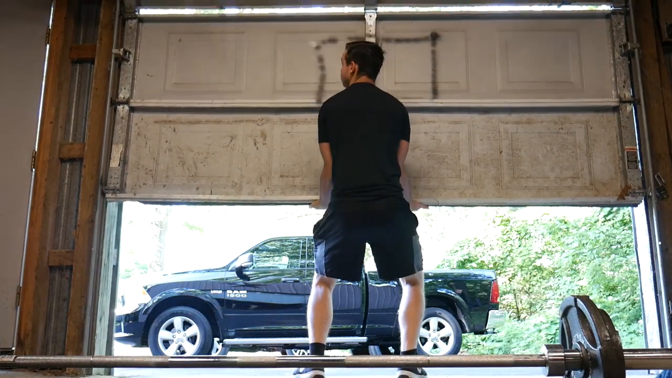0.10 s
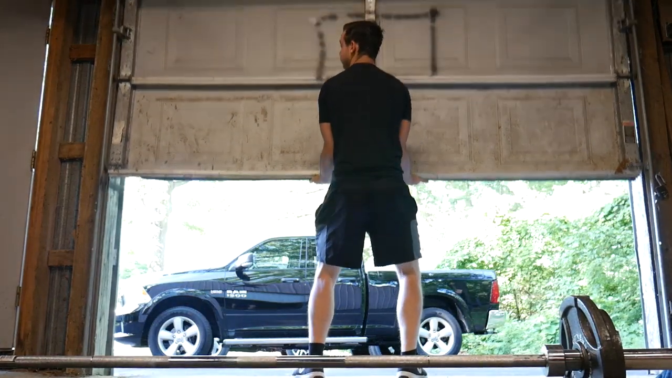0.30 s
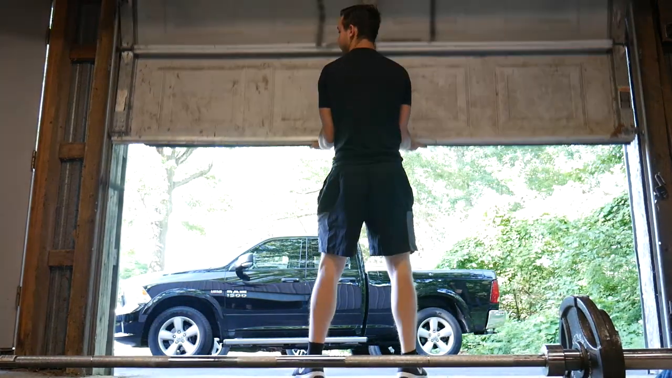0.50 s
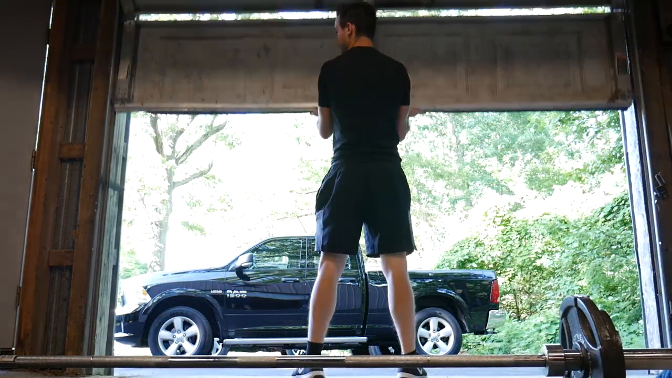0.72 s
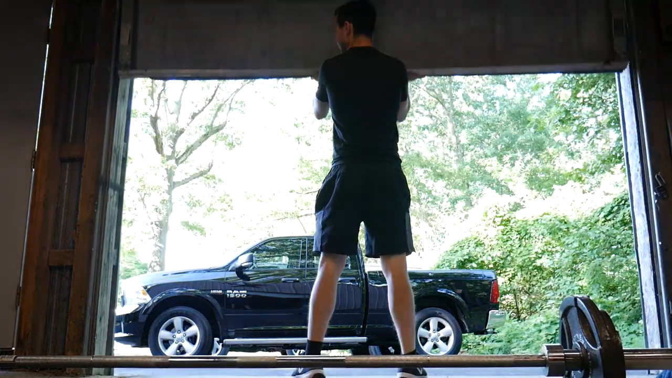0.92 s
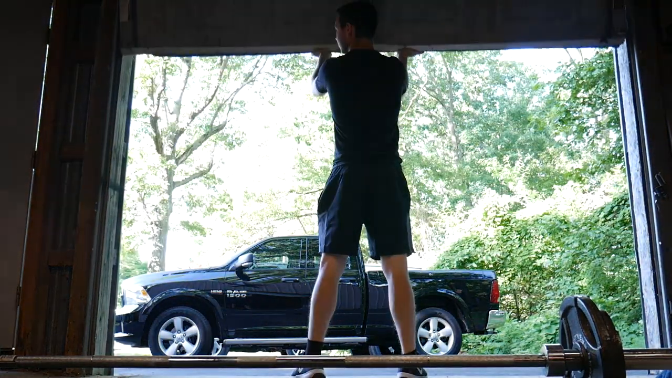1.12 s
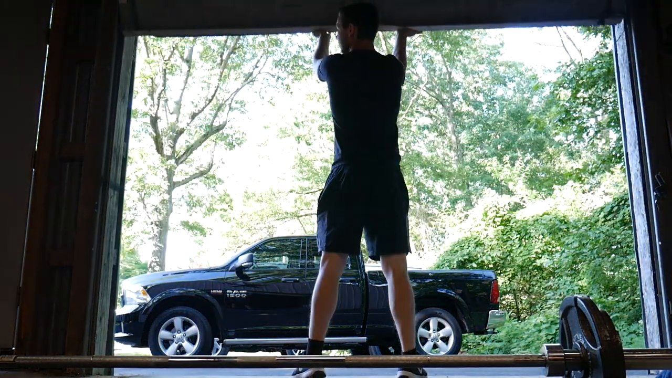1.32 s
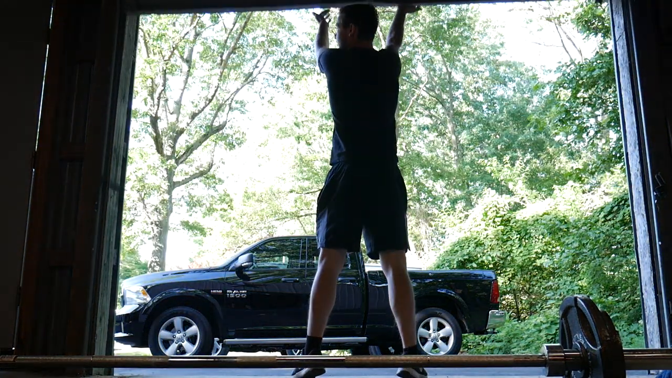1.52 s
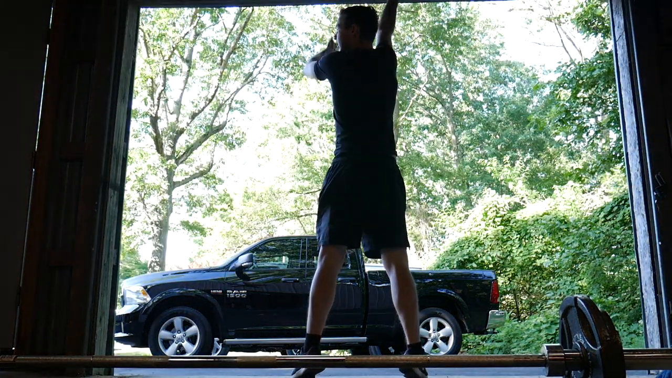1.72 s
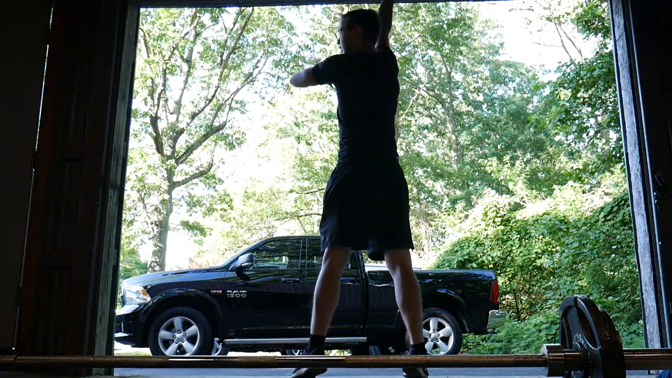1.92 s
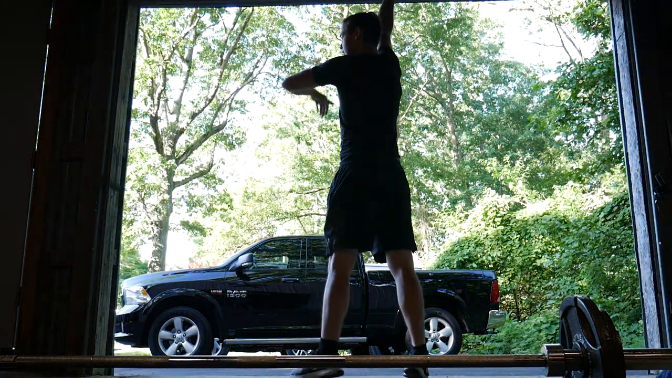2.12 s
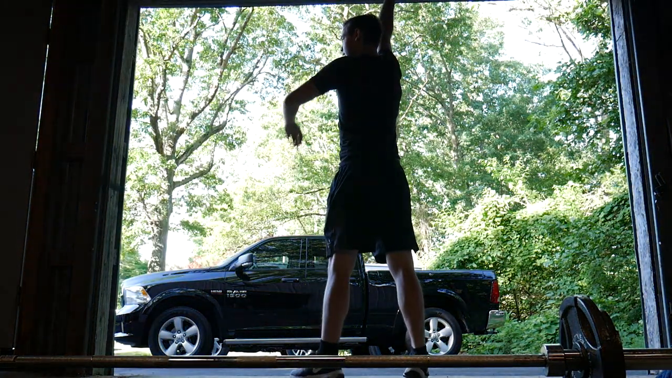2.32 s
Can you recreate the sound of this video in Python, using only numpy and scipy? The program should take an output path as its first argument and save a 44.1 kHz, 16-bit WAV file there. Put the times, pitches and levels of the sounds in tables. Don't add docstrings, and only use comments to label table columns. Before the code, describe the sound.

A sectional metal garage door rolls up by hand in a hard-walled garage, a few metres from a phone. Roller chatter starts softly, swells by 0.5 s, with dense hinge clacks until about 1.15 s and a low panel rumble. Sparser clacks lead to a hard, bouncing bang at 1.7 s with a short metallic ring. Fine ticks follow around 2.1 s, then a weak knock at 2.25 s over faint hiss.

```python
import sys
import numpy as np
from scipy import signal
from scipy.fft import rfft, irfft
from scipy.io import wavfile
from scipy.ndimage import uniform_filter1d

SR = 44100
rng = np.random.default_rng(int(sys.argv[2]) if len(sys.argv) > 2 else 0)


def gain_from_decibels(decibels):
    exponent = np.asarray(decibels, float) / 20
    return 10 ** exponent


def put_to_file(sound):
    columns = np.atleast_2d(sound).T
    safe = np.clip(columns, -1, 1)
    whole_steps = np.round(safe * 32767)
    wavfile.write(sys.argv[1], SR, whole_steps.astype(np.int16))


N = 105840

# [t/s, level/dB, brightness/(dB per octave)]
ROLLING_COURSE = [(0, -28.5, -9.5), (.1, -31, 0.5), (.2, -25.5, 1.5), (.3, -21, 2), (.44, -18, 1.7),
                  (.52, -16.5, 2), (.66, -20, 2.2), (.76, -18, 1.5), (.85, -17.5, 0.4), (.95, -20, 2.3),
                  (1.1, -20.5, 1.2), (1.25, -22.5, -0.3), (1.401, -25, 1.5), (1.55, -21.5, 1.6),
                  (1.64, -21.5, 0.65), (1.68, -24.5, 1.1), (2, -38, 1.4), (2.4, -42, -8)]
# [f/Hz, density/(dB per Hz)]
ROLLER_SPECTRUM = [(120, -30), (300, -10.5), (520, -9), (900, -1.5), (1900, -7.5), (9300, -27),
                   (10300, -32), (15500, -39)]
# [f/Hz, level/dB, t60/s]
TRACK_MODES = [(330, -11, .06), (526, -9, .05), (680, -7, .05), (770, -5, .06), (845, -5, .05),
               (925, -7, .05), (990, -7, .05), (1095, -9, .04), (1270, -10, .04), (1600, -11, .04),
               (2015, -11, .05)]
# [t/s, level/dB]
RUMBLE_COURSE = [(0, -50), (.15, -49), (.3, -37), (.6, -48), (.8, -38), (.9, -31), (1.05, -31.5),
                 (1.15, -31.5), (1.4, -36), (1.52, -31.5), (1.6, -27.5), (1.68, -35.5), (1.78, -36),
                 (1.95, -39.5), (2.05, -47), (2.4, -61)]
# [f/Hz, density/(dB per Hz)]
PANEL_SPECTRUM = [(25, -20), (54, -44), (95, 0.5), (135, -0.5), (170, 11), (230, -1.5), (325, -6),
                  (450, -18.5)]
# [t/s, level/dB, brightness/(dB per octave), f of struck part/Hz, ring level/dB]
CLACK_EVENTS = [(0.03, -29, 1, 6000, -29), (0.0345, -23.5, -3.5, 3400, -11), (0.046, -32, -6, 3200, -5),
                (0.06, -28.5, 0.5, 2400, -22), (.136, -26.5, -4, 940, -1), (.192, -39, -3, 1170, -9),
                (.458, -13, 0, 5000, -21), (0.572, -20, -7, 820, 4), (.615, -21, -7, 800, 5),
                (0.491, -21, -12, 1700, -6), (.515, -19, -1, 2030, -16), (.55, -19, -3, 2820, -16),
                (.41, -30.5, -8, 328, 8.5), (.662, -25, 0, 890, 4), (.69, -14.5, -4, 2000, -8),
                (.725, -18.5, -7, 2200, -21), (.768, -16.5, -0.5, 2980, -6), (0.7771, -13, 1, 3100, -5.5),
                (0.8054, -15, -1, 7300, -14), (.807, -16.5, 1, 1330, 2.5), (.832, -10.5, -5.5, 820, -5),
                (0.846, -21, -7, 2660, 3.5), (.856, -15, 0, 1070, 2), (.899, -20, -3, 1000, -5),
                (0.99, -12, -5, 5940, -6), (1.018, -16.5, -3, 1070, -1.5), (1.047, -19, -2.5, 2940, 0),
                (1.029, -9, -4.5, 2280, -17), (1.156, -17.5, -1.5, 8400, -16), (1.326, -26, 8, 9540, -8),
                (1.409, -25.5, 0.5, 6000, -28), (1.459, -18.5, -2, 4100, -28),
                (1.506, -14.5, -4, 2800, -19), (1.279, -22.5, -1.5, 1600, -21), (1.77, -20, -8, 920, 1),
                (2.038, -24.5, 0.5, 4170, -20), (2.042, -24.5, -2.5, 860, -4), (2.078, -39.5, 7, 766, 3),
                (2.2455, -38.5, 1, 9300, 2.5), (2.2512, -22.5, -2, 2700, -21), (2.256, -28, 2, 1540, 4),
                (2.272, -32.5, -3, 770, 1.5)]
# [f/Hz, density/(dB per Hz)]
CLACK_SPECTRUM = [(120, -62), (300, -62), (800, -12), (1530, -8.5), (1840, -7), (1980, -7.5), (3180, -8),
                  (3950, -7.5), (15500, -25.5)]
# [t/s, level/dB]
SLAM_BOUNCES = [
    (1.6966, -6.5),
    (1.704, -10.5),
    (1.716, -9),
    (1.728, -16.5),
]
# [f/Hz, density/(dB per Hz)]
SLAM_SPECTRUM = [(200, -32), (900, -11), (1450, -3.5), (1750, -7.5), (2150, -3.5), (3100, -11),
                 (3900, -7.5), (15500, -27.5)]
# [t/s, level/dB]
BRACKET_BLOWS = [
    (1.6972, -13),
    (2.2522, -35.5),
]
# [f/Hz, level/dB, t60/s]
BRACKET_MODES = [(991, -13, .2), (1502, -8, .2), (2015, 1.5, .3), (2060, -2, .1), (2110, 0, .08),
                 (2210, 3, .08), (2320, 1.5, .08), (2385, -2, .08), (2600, -4, .08), (2920, -6, .1),
                 (3790, -4, .4), (3850, -8, .3), (3885, -6, .3)]
# [t/s, peak level/dB, f/Hz]
SETTLING_TICKS = [
    (1.955, -25, 8060),
    (2.083, -14, 7800),
    (2.1, -18, 8200),
    (2.107, -31, 8000),
    (2.126, -15.5, 4420),
    (2.142, -23, 8500),
    (2.154, -19, 7950),
    (2.173, -34, 8500),
    (2.186, -40, 7040),
]
# [f/Hz, t60/s]
ROOM_T60 = [(100, 0.64), (500, 0.61), (1400, 0.46), (3700, 0.48), (9700, 0.36), (15000, 0.25)]
# [f/Hz, density/(dB per Hz)]
AIR_SPECTRUM = [(15, -40), (25, -36), (551, -18), (894, 12), (7890, 1), (9790, -5), (12800, -12),
                (15500, -31)]
# [f/Hz, side minus mid level/dB]
STEREO_WIDTH = [(60, -16), (110, -27.5), (200, -32), (380, -25.5), (700, -34), (1290, -32), (2380, -26),
                (4400, -20.5), (8120, -19), (15000, -11)]
OCTAVES = 31.25 * 2 ** np.arange(10)
SIDE_BANDS = 100 + 480. * np.arange(34)


def rolling():
    knocks_per_s, knock_spread_db = 2600, 3
    track_db, rail_hz, rail_t60_s = -19.5, 797, .09
    t, course = np.arange(N) / SR, np.array(ROLLING_COURSE)
    level_db = np.interp(t, course[:, 0], course[:, 1])
    bright_db = np.interp(t, course[:, 0], course[:, 2])
    chance = rng.random((3, N))
    size = gain_from_decibels(knock_spread_db * np.minimum(-np.log(chance[1] + 1e-9), 4))
    knocks = (chance[0] < knocks_per_s / SR) * size * np.sign(chance[2] - .5)

    track = sum(gain_from_decibels(db + 2.6 * walk(20)) * unit(ring(knocks, hz, t60)) for hz, db, t60 in TRACK_MODES)
    rail_db = -7.5 + 0.82 * (level_db - level_db.max()) + 2.34 * walk(12)
    rail = gain_from_decibels(rail_db) * unit(ring(knocks, rail_hz, rail_t60_s))
    body = unit(colour(knocks, ROLLER_SPECTRUM)) + gain_from_decibels(track_db) * unit(track) + rail

    shared = walk(15)
    flickering = 0
    for hz, band in zip(OCTAVES, split(body, OCTAVES)):
        tilt_db = bright_db * max(np.log2(hz / 1000), 0)
        flickering = flickering + band * gain_from_decibels(tilt_db + .7 * (shared + walk(16.78)))
    return flickering * gain_from_decibels(level_db - 4.0)


def panels():
    rumble = unit(colour(rng.standard_normal(N), PANEL_SPECTRUM))
    rumble = signal.sosfilt(signal.butter(4, 480, fs=SR, output="sos"), rumble)
    level_db = np.interp(np.arange(N) / SR, *np.array(RUMBLE_COURSE).T)
    return rumble * gain_from_decibels(level_db - 4.5 + 0.26 * walk(10.0))


def slam():
    out, t = np.zeros(N + SR), np.arange(SR // 2) / SR
    for s, db in SLAM_BOUNCES:
        blow = colour(rng.standard_normal(len(t)), SLAM_SPECTRUM) * blow_shape(t)
        place(out, s, gain_from_decibels(db - 5.5) * early_unit(blow))
    return out[:N]


def clacks():
    part_spread, part_t60_s = 0.086, .013
    out, t = np.zeros(N + SR), np.arange(SR // 2) / SR
    shape = blow_shape(t)
    for s, db, tilt_db, hz, ring_db in CLACK_EVENTS:
        noise = rng.standard_normal(len(t))
        blow = early_unit(colour(noise, CLACK_SPECTRUM, tilt_db) * shape)
        part = sum(ring(noise * shape, hz * (1 + part_spread * k), part_t60_s) for k in (-1, 0, 1))
        place(out, s, gain_from_decibels(db - 5.5) * (blow + gain_from_decibels(ring_db) * early_unit(part)))
    return out[:N]


def bracket():
    out, t = np.zeros(N + SR), np.arange(SR // 2) / SR
    for s, db in BRACKET_BLOWS:
        scatter, sign = rng.standard_normal((2, len(BRACKET_MODES)))
        for (hz, mode_db, t60), a, b in zip(BRACKET_MODES, scatter, sign):
            decay = gain_from_decibels(db + mode_db + 1.5 * a - 60 * t / t60)
            place(out, s, decay * np.sin(2 * np.pi * hz * t) * np.sign(b))
    return out[:N]


def ticks():
    t60_s, level_db = 0.0016, 1.5
    out, t = np.zeros(N + SR), np.arange(SR // 2) / SR
    for s, db, hz in SETTLING_TICKS:
        place(out, s, gain_from_decibels(db + level_db) * np.sin(2 * np.pi * hz * t) * gain_from_decibels(-60 * t / t60_s))
    return out[:N]


def garage(x):
    build_s, change_s, level_db = 0.0022, .035, 4
    hop, t = int(change_s * SR), np.arange(2 ** 15) / SR
    build = 1 - np.exp(-t / build_s)
    fades = [gain_from_decibels(-60 * t / read(ROOM_T60, hz)) * build for hz in OCTAVES]
    x, out = np.pad(x, (hop, 2 * hop)), np.zeros(N + 4 * hop + len(t))
    bands = split(rng.standard_normal(8 * len(t)), OCTAVES)
    window = np.sin(np.pi * np.arange(2 * hop) / (2 * hop))
    for i in range(0, N + hop, hop):
        start = rng.integers(7 * len(t))
        tail = sum(band[start:start + len(t)] * fade for band, fade in zip(bands, fades))
        tail = tail / np.sqrt(np.sum(tail ** 2))
        out[i:i + 2 * hop + len(t) - 1] += signal.fftconvolve(x[i:i + 2 * hop] * window, tail)
    return gain_from_decibels(level_db) * out[hop:hop + N]


def flicker(side):
    frame, frame_share, band_share = 1024, .5, .6
    chance = rng.random((N // frame + 2, len(SIDE_BANDS) + 1))
    frame_on = chance[:, :1] < frame_share
    band_on = chance[:, 1:] < band_share * (1.5 - SIDE_BANDS / 14000)
    gates = np.repeat(1. * frame_on * band_on, frame, axis=0)[94:N + 94]
    gates = uniform_filter1d(gates, size=500, axis=0).T
    return sum(gate * band for gate, band in zip(gates, split(side, SIDE_BANDS)))


def air():
    return gain_from_decibels(-41) * unit(colour(rng.standard_normal(N), AIR_SPECTRUM))


def unit(x):
    return x / np.sqrt(np.mean(x ** 2))


def early_unit(x):
    return x / np.sqrt(np.mean(x[:SR // 50] ** 2))


def blow_shape(t):
    return np.exp(-t / 0.0073) * (1 - np.exp(-t / 0.00065))


def place(out, s, sound):
    start = int(s * SR)
    out[start:start + len(sound)] += sound


def read(table, hz):
    table = np.array(table)
    return np.interp(np.log(hz + 1), np.log(table[:, 0]), table[:, 1])


def colour(x, table, tilt_db=0.):
    hz = np.arange(len(x) // 2 + 1) * SR / len(x)
    gain_db = read(table, hz) + tilt_db * np.log2((hz + 50) / 2000)
    return irfft(rfft(x) * gain_from_decibels(gain_db), len(x))


def ring(x, hz, t60):
    r = np.exp(-np.log(1000) / (max(t60, .002) * SR))
    angle = 2 * np.pi * hz / SR
    return signal.lfilter([np.sin(angle)], [1, -2 * r * np.cos(angle), r * r], x)


def split(x, edges):
    hz, spectrum = np.arange(len(x) // 2 + 1) * SR / len(x), rfft(x)
    position, corners = np.log(hz + 1), np.log(edges)
    return [irfft(spectrum * np.interp(position, corners, row), len(x)) for row in np.eye(len(edges))]


def walk(rate):
    k = int(SR / rate)
    held = np.repeat(rng.standard_normal(N // k + 1), k)
    return 1.3 * uniform_filter1d(uniform_filter1d(held, k), k)[:N]


def scene():
    roll = rolling() + panels()
    hits = slam() + clacks() + ticks()
    rung = bracket()
    to_room = roll + gain_from_decibels(-2) * hits + gain_from_decibels(-10.5) * rung
    mid = roll + hits + rung + garage(to_room) + air()
    side = gain_from_decibels(12) * flicker(colour(garage(roll) + air(), STEREO_WIDTH))
    return np.array([mid + side, mid - side])


def roll_off(x):
    return signal.sosfilt(signal.butter(12, 15610, fs=SR, output="sos"), x)


def record(dry):
    low_hz, top_hz, clip = 64.5, 15650, .97
    x = signal.sosfilt(signal.butter(3, low_hz, "high", fs=SR, output="sos"), dry)
    x = np.clip(x, -clip, clip)
    x = signal.sosfilt(signal.ellip(10, .2, 80, top_hz, fs=SR, output="sos"), x)
    return roll_off(x)


dry = scene()
out = record(dry)
put_to_file(out)
```